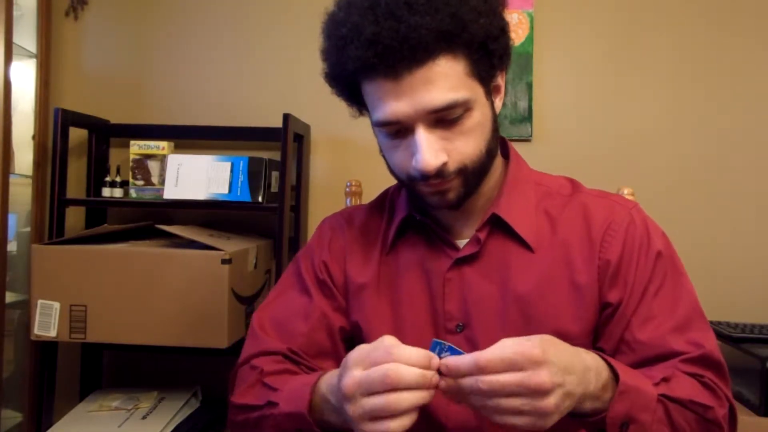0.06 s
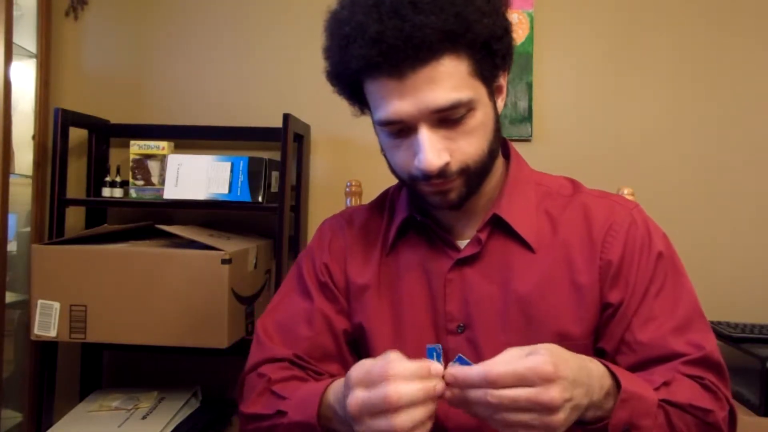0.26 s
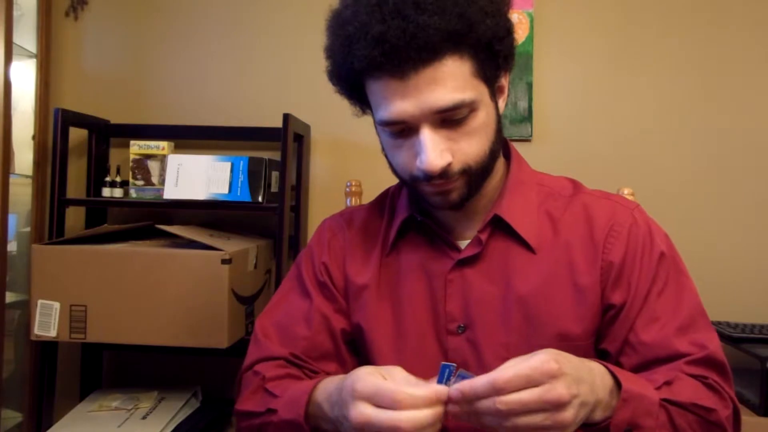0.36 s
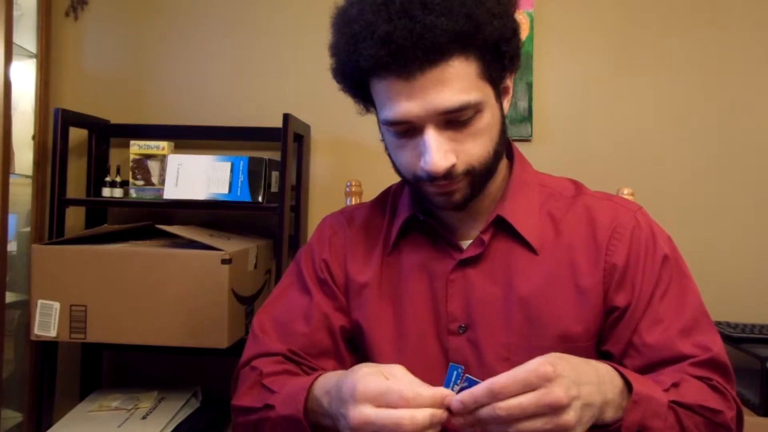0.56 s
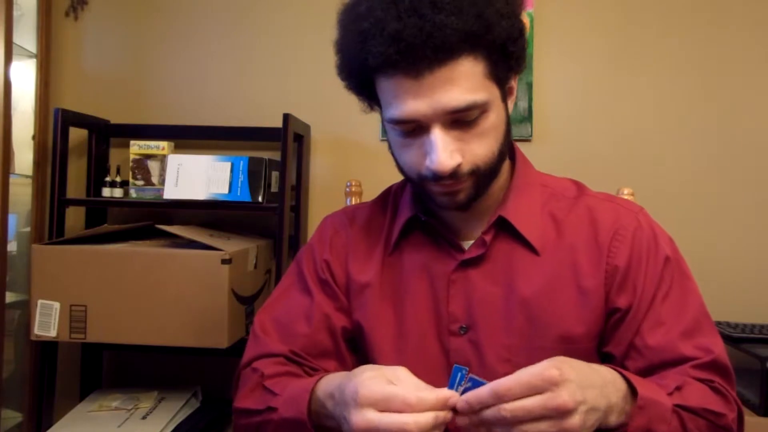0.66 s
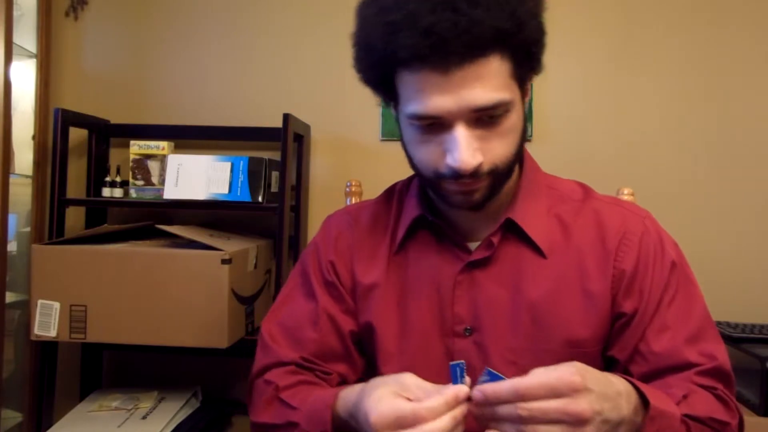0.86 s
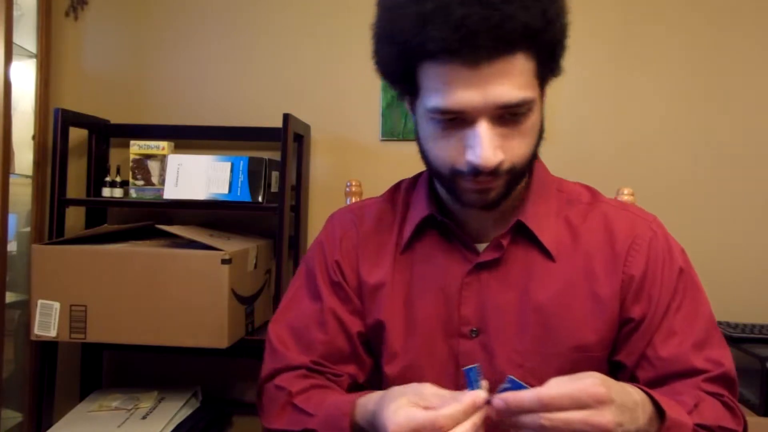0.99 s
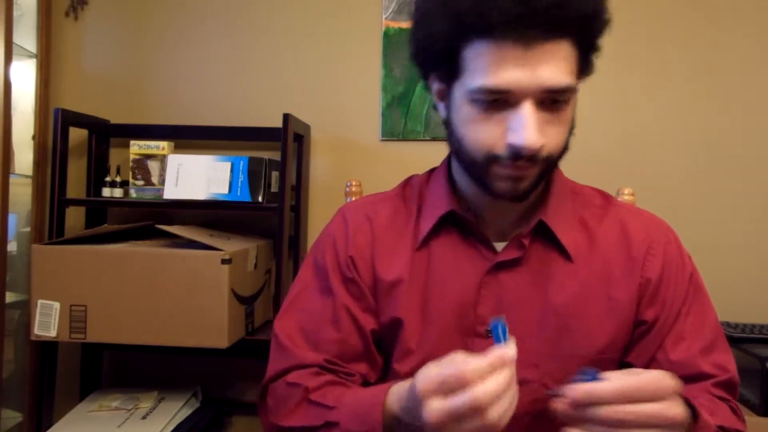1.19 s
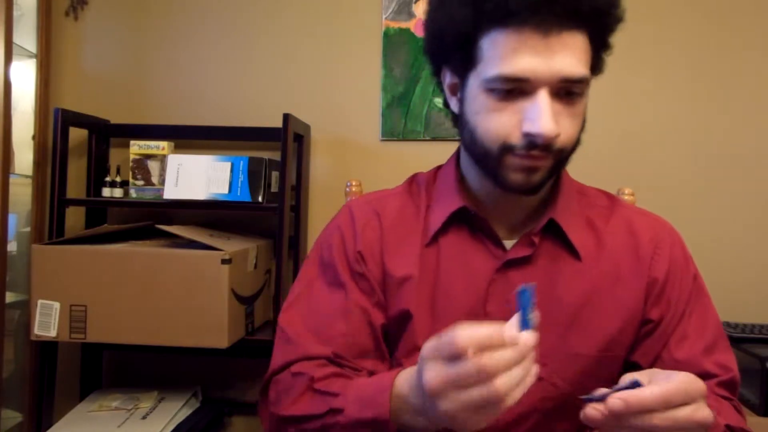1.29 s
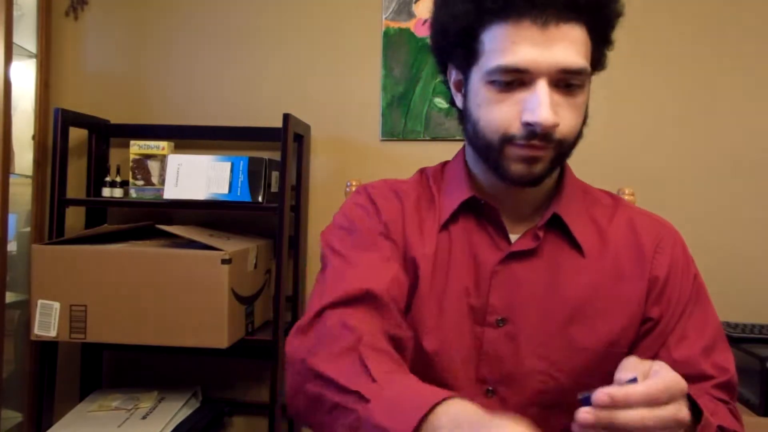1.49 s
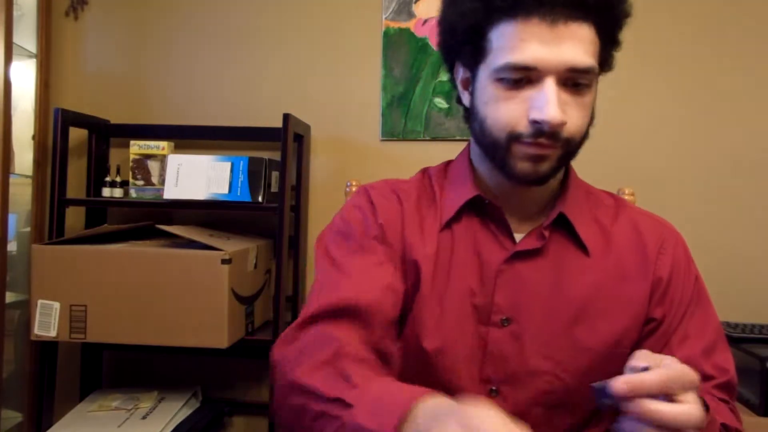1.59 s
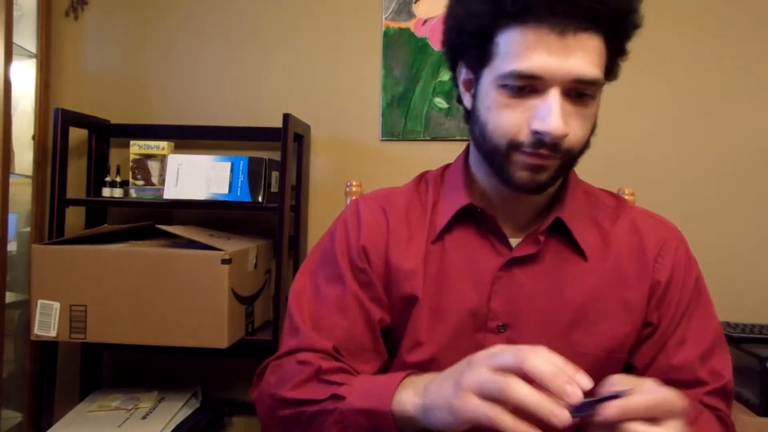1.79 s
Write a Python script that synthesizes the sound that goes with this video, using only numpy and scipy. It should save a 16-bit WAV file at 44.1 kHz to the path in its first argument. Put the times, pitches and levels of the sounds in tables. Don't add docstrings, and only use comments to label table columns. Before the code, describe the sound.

Small stiff paper pieces are snapped and peeled by hand: one loud crisp snap, a pause, a cluster of crackly clicks, then lighter ticks and a sleeve brush, close to the microphone in a small quiet room.

```python
import sys
import numpy as np
from scipy import signal
from scipy.fft import rfft, irfft
from scipy.io import wavfile

SR = 44100
rng = np.random.default_rng(int(sys.argv[2]) if len(sys.argv) > 2 else 0)


def gain_from_db(level_db):
    decades = np.asarray(level_db, float) / 20
    return 10 ** decades


def pcm_store(signal):
    levels = np.round(np.clip(np.atleast_2d(signal), -1, 1) * 32767)
    wavfile.write(sys.argv[1], SR, levels.astype(np.int16).T)


N = 81585


def read(points, hz):
    f, value = np.transpose(points)
    return np.interp(np.log(hz + 1), np.log(f + 1), value)


def evened(x):
    return x / np.sqrt(np.mean(x ** 2) + 1e-20)


def add(mix, start_s, sound):
    part = mix[int(start_s * SR):][:len(sound)]
    part += sound[:len(part)]


def stroke(spans):
    t = np.arange(N) / SR
    level = np.zeros(N)
    for start_s, length_s, db in spans:
        progress = np.clip((t - start_s) / length_s, 0, 1)
        level += gain_from_db(db) * np.sin(np.pi * progress ** 0.55)
    return level


def ring(hz, width_hz, late_samples=0.):
    u = np.maximum(np.arange(900) - late_samples, 0) / SR * 2 * np.pi
    envelope = (u * width_hz / 2) ** 2 * np.exp(2 - u * width_hz)
    return envelope * np.sin(u * hz)


def knock(mix, peak_s, db, hz, width_hz):
    start_s = peak_s - 1 / (np.pi * width_hz)
    late_samples = start_s * SR % 1
    add(mix, start_s, gain_from_db(db) * ring(hz, width_hz, late_samples))


def port_noise(hz):
    # (frequency [Hz], left-right likeness [0-1])
    likeness = [(60, 0.96), (180, 0.53), (540, 0.43), (1620, 0.21), (4840, 0.078), (14500, 0.05)]
    # (frequency [Hz], left minus right [dB])
    balance = [(60, 2), (240, -1), (930, 0.5), (3680, 0.0), (14500, -4.5)]
    a, b = rfft(rng.standard_normal((2, N)))
    same = np.clip(read(likeness, hz), 0, 1)
    tilt = gain_from_db(read(balance, hz) / 2)
    return np.array([a * tilt, (same * a + np.sqrt(1 - same ** 2) * b) / tilt])


def hiss(noise, hz):
    # (frequency [Hz], level [dB per Hz])
    colour = [(12, -21), (22, 1), (45, -11.5), (110, -14.5), (240, -17), (500, -22.5), (1300, -28),
              (14200, -37)]
    level_db = -56.5
    return gain_from_db(level_db) * evened(irfft(noise * gain_from_db(read(colour, hz)), N))


def whine(noise, hz):
    # (frequency [Hz], width [Hz], level [dB])
    bands = [(12380, 240, -81), (13050, 170, -80), (13800, 220, -79)]
    out = np.zeros((2, N))
    for centre_hz, width_hz, db in bands:
        resonance = 1 / (1 + ((hz - centre_hz) / width_hz * 2) ** 2)
        out += gain_from_db(db) * evened(irfft(noise * resonance, N))
    return out


def hum():
    # (frequency [Hz], level [dB rms])
    tones = [
        (60, -68.5),
        (238, -75),
        (357, -72),
    ]
    t = np.arange(N) / SR
    out = np.zeros(N)
    for hz, db in tones:
        out += gain_from_db(db + 2.5) * np.sin(2 * np.pi * (hz * t + rng.random()))
    return out


def air():
    hz = np.fft.rfftfreq(N, 1 / SR)
    noise = port_noise(hz)
    return hiss(noise, hz) + whine(noise, hz) + hum()


def room(x):
    # (frequency [Hz], T60 [s])
    decay = [(300, 0.47), (1200, 0.33), (3000, 0.29), (6000, 0.2), (12000, 0.16)]
    # (frequency [Hz], level [dB])
    colour = [(300, 5), (1600, 0.5), (3000, 3.5), (5000, -5.5), (8500, 3.5), (13000, -6.5)]
    level_db, left_db, start_s = -13, -2, 0.004
    length, spacing = SR // 2, 14
    taps = np.zeros((2, length))
    at = np.arange(0, length - 20, spacing)
    at = at + rng.integers(0, spacing, (2, len(at)))
    np.put_along_axis(taps, at, rng.choice([-1., 1.], at.shape), 1)
    hz, t, z = signal.stft(taps, SR, nperseg=128)
    fade_db = read(colour, hz)[:, None] - 60 * t / read(decay, hz)[:, None]
    tail = signal.istft(z * gain_from_db(fade_db), SR, nperseg=128)[1]
    tail = tail / np.linalg.norm(tail[0])
    tail = np.pad(tail, ((0, 0), (round(start_s * SR), 0)))
    gain = gain_from_db(np.array([[level_db + left_db], [level_db]]))
    return signal.fftconvolve(x[None], tail, axes=1)[:, :N] * gain


def nearby(x):
    # (delay [s], level [dB], dulled above [Hz])
    bounces = [(.0013, -20.5, 9000), (.0027, -34, 7600), (0.0108, -17, 9400), (.0160, -16, 4000)]
    # (frequency [Hz], left minus right [dB])
    shadow = [(300, 0), (1300, -1.3), (2400, -2), (4300, -6), (7900, -8), (11000, -13), (14500, -14)]
    left_lag_s = 1 / SR
    hz = np.fft.rfftfreq(N, 1 / SR)
    path = np.ones(len(hz), complex)
    for delay_s, db, dull_hz in bounces:
        path += gain_from_db(db) * np.exp(-2j * np.pi * hz * delay_s) / (1 + 1j * hz / dull_hz) ** 2
    left = gain_from_db(read(shadow, hz)) * np.exp(-2j * np.pi * hz * left_lag_s)
    return irfft(rfft(x) * path * np.array([left, np.ones(len(hz))]), N)


def brushing():
    # (start [s], length [s], level [dB])
    moves = [(-0.024, 0.33, -62), (1.58, 0.26, -66), (1.15, .15, -71), (1.646, 0.039, -52.5),
             (1.35, 0.29, -72)]
    # (frequency [Hz], level [dB])
    cloth = [(100, -20), (200, -0.5), (700, 0), (1400, -7.5), (3000, -15), (14000, -20)]
    hz = np.fft.rfftfreq(N, 1 / SR)
    noise = rng.standard_normal((3, N))
    ports = noise[:2] * 0.26 + noise[2]
    return stroke(moves) * evened(irfft(rfft(ports) * gain_from_db(read(cloth, hz)), N))


def crackle(spans, colour):
    cracks_per_s, spread_db = 7000, 2.5
    out = np.zeros(N)
    for hz, width_hz, db in colour:
        size_db = spread_db * np.minimum(rng.exponential(1, N), 3)
        size = gain_from_db(size_db) * rng.choice([-1., 1.], N)
        cracks = size * (rng.random(N) < cracks_per_s / SR)
        out += gain_from_db(db) * evened(signal.oaconvolve(cracks, ring(hz, width_hz))[:N])
    return out * stroke(spans)


def sliding():
    # (start [s], length [s], level [dB])
    rubs = [(.08, 0.14, -67), (.40, 0.018, -65), (.46, .02, -64), (1.04, 0.019, -62.5), (1.14, .015, -65),
            (1.32, 0.031, -67), (1.44, 0.083, -65), (1.555, 0.054, -65), (1.633, 0.047, -60),
            (1.69, 0.031, -59)]
    # (frequency [Hz], width [Hz], level [dB])
    skin = [(5400, 960, -2.5), (9400, 1600, -7.5), (11450, 930, 1), (13500, 1300, -2)]
    return crackle(rubs, skin)


def peeling():
    # (start [s], length [s], level [dB])
    peels = [(.916, .03, -56.5), (.934, 0.014, -48), (.950, 0.02, -48.5), (.961, 0.055, -58),
             (1.200, 0.038, -59), (1.230, 0.014, -46.5), (1.646, 0.05, -65)]
    # (frequency [Hz], width [Hz], level [dB])
    fibres = [(1900, 1200, -9), (5600, 1600, -3), (7800, 670, -21), (10800, 930, 0), (12440, 3800, 8)]
    return crackle(peels, fibres)


def pushes():
    # (time [s], level [dB], frequency [Hz], width [Hz])
    bends = [(.2024, -24.5, 1338, 328), (.2034, -23.5, 1990, 487), (.2030, -20.5, 3600, 605),
             (0.2054, -23, 1900, 592), (.2036, -32.5, 609, 116.8), (.2040, -25, 2730, 455),
             (0.9138, -36, 1900, 905), (.9155, -44, 575, 170), (0.927, -36.5, 1970, 790),
             (.9270, -43.5, 517, 252), (.9410, -37, 1900, 815), (.9607, -34, 1800, 820),
             (1.2059, -36.5, 2270, 568), (1.2050, -45, 510, 240), (1.2329, -32, 1650, 600),
             (1.2335, -64, 610, 248), (1.2400, -36, 1390, 720), (1.243, -43, 239, 90),
             (1.6489, -36, 2340, 710), (1.6480, -40.5, 980, 400), (1.6480, -45, 340, 200)]
    out = np.zeros(N)
    for row in bends:
        knock(out, *row)
    return out


def snaps():
    # (time [s], ring level [dB], ring frequency [Hz], edge level [dB])
    breaks = [(0.2019, -6.5, 5280, -43), (0.2015, -16, 8960, -2), (0.203, -8.5, 4640, -16),
              (.20461, -12, 5240, -27), (0.4037, -43, 5000, -56), (.9140, -23, 6500, -27),
              (0.927, -24, 7800, -23), (.9275, -26.5, 5480, -34), (.9284, -34, 7560, -36),
              (0.941, -23.5, 7040, -23.5), (.9552, -29, 7800, -31), (0.958, -43, 7500, -30),
              (0.9604, -16, 6480, -15.5), (0.9671, -32, 7000, -31), (.9512, -44, 7960, -40),
              (1.202, -39, 5000, -36), (1.2048, -34, 4340, -17.5), (1.2325, -32, 5800, -23),
              (1.2322, -40, 4540, -32), (1.2388, -30.5, 4520, -38), (1.2398, -32, 4450, -31),
              (1.2398, -30, 5000, -24), (1.3260, -54, 9000, -45), (1.3450, -50, 8500, -41.5),
              (1.4475, -44.5, 5600, -55), (1.6331, -38, 6300, -34.5), (1.6472, -26, 9100, -31),
              (1.6478, -35.5, 4000, -50), (.1770, -47, 6000, -40)]
    ring_width_hz = 1175
    edge_hz, edge_width_hz = 12700, 1300
    splinter_db, splinter_s = -8.5, 0.0011
    decay = np.exp(-np.arange(400) / SR / splinter_s)
    out = np.zeros(N)
    for time_s, ring_db, hz, edge_db in breaks:
        knock(out, time_s, edge_db, edge_hz, edge_width_hz)
        knock(out, time_s, ring_db, hz, ring_width_hz)
        rough = np.diff(rng.standard_normal(401)) / 2
        size = 0.98 * gain_from_db(ring_db) + gain_from_db(edge_db)
        add(out, time_s, size * gain_from_db(splinter_db) * decay * rough)
    return out


def scene():
    low_cut = signal.butter(2, 300, "high", fs=SR, output="sos")
    paper = signal.sosfilt(low_cut, sliding() + peeling() + pushes() + snaps())
    return air() + room(paper) + nearby(paper) + brushing()


def low_pass(x):
    return signal.sosfilt(signal.butter(12, 15120, fs=SR, output="sos"), x)


def record(dry):
    top_hz, shelf_db, slope_db_per_khz = 14280, -30, -6
    above_hz = np.fft.rfftfreq(N, 1 / SR) - top_hz
    shelf = shelf_db * np.clip(above_hz / 150, 0, 1)
    slope = slope_db_per_khz * np.maximum(above_hz, 0) / 1000
    mix = irfft(rfft(dry) * gain_from_db(shelf + slope), N)
    return low_pass(mix)


dry = scene()
out = record(dry)
pcm_store(out)
```